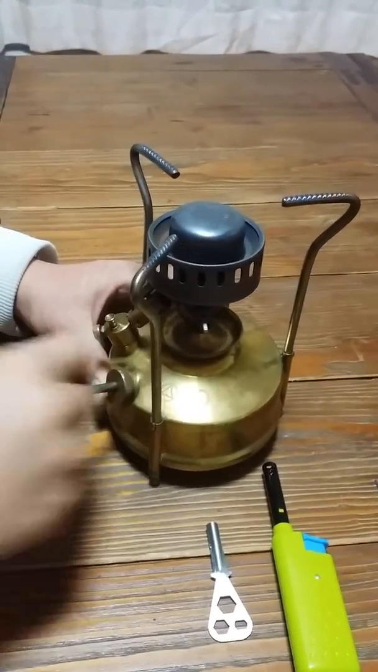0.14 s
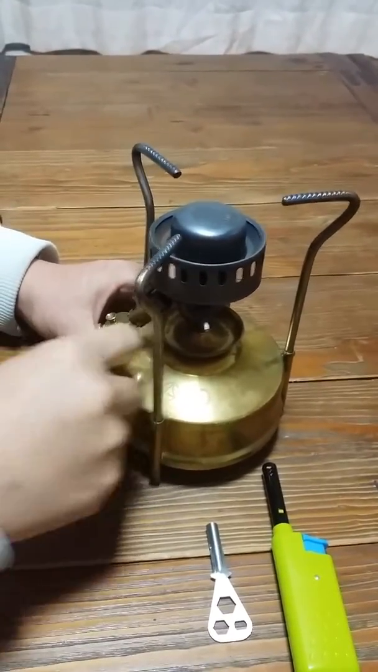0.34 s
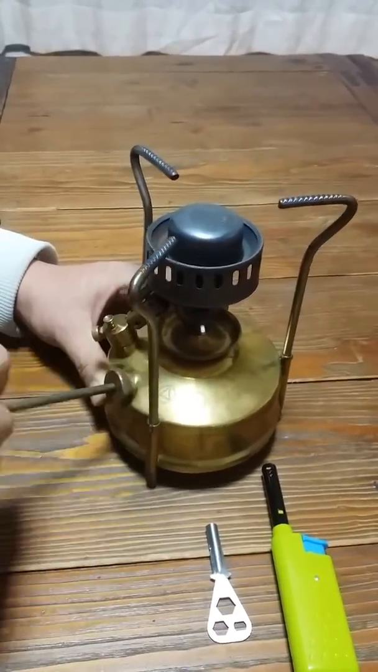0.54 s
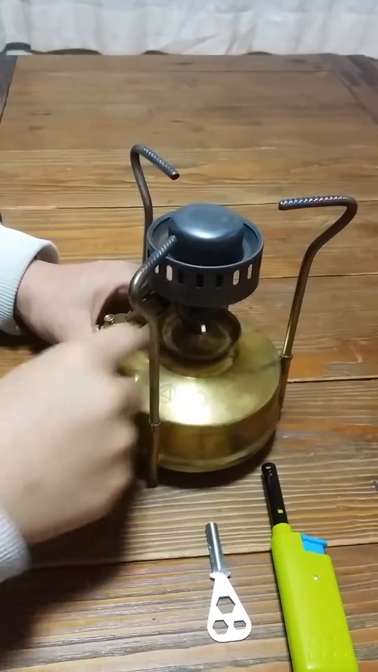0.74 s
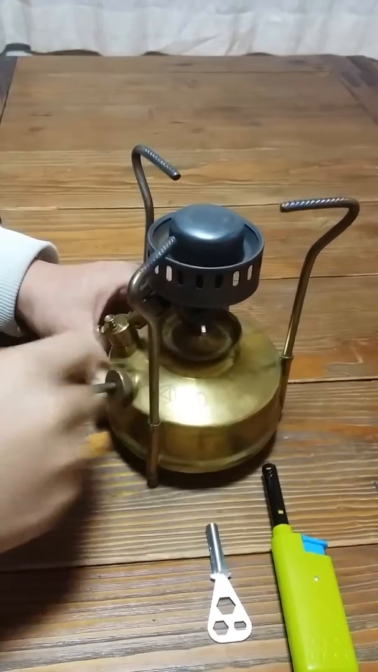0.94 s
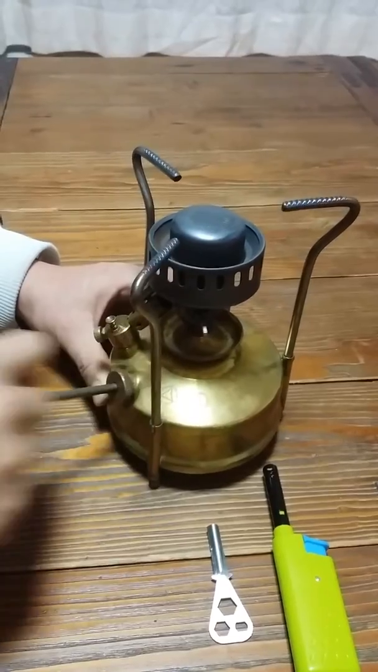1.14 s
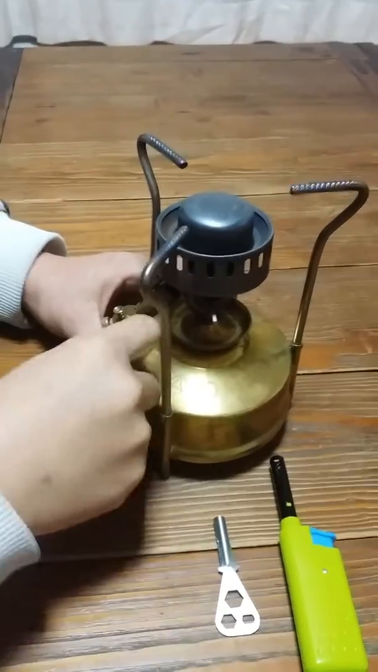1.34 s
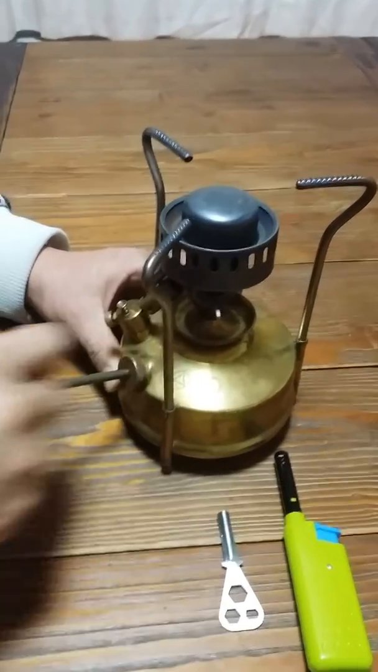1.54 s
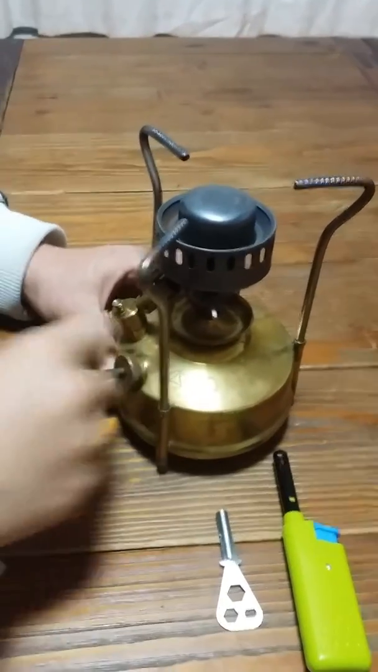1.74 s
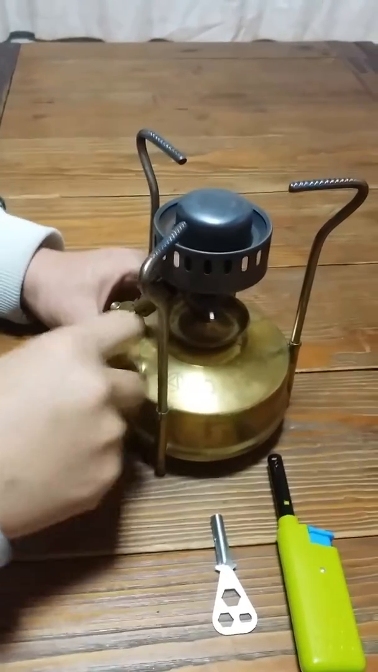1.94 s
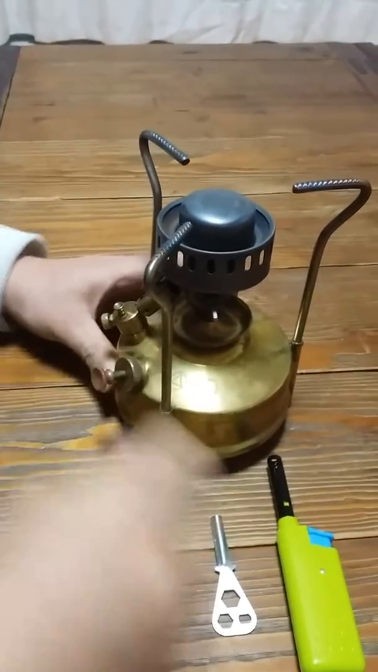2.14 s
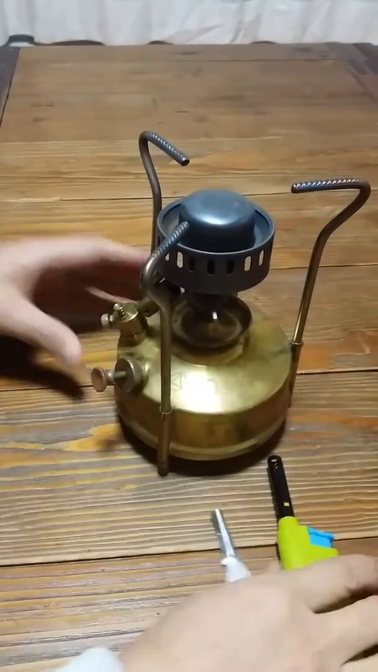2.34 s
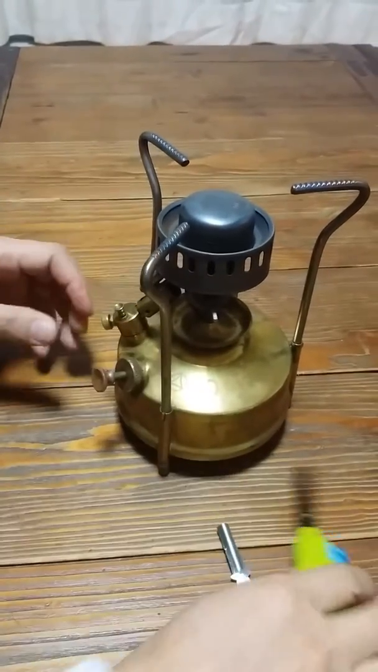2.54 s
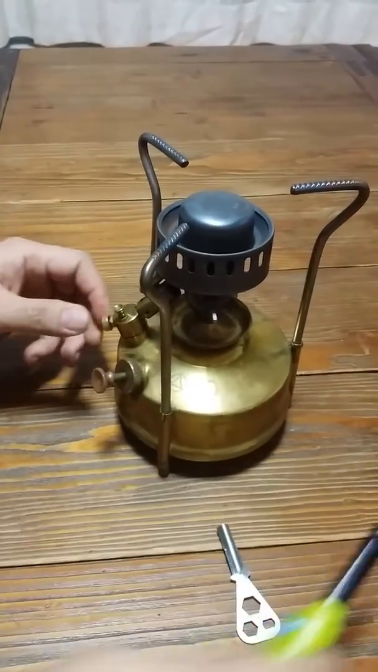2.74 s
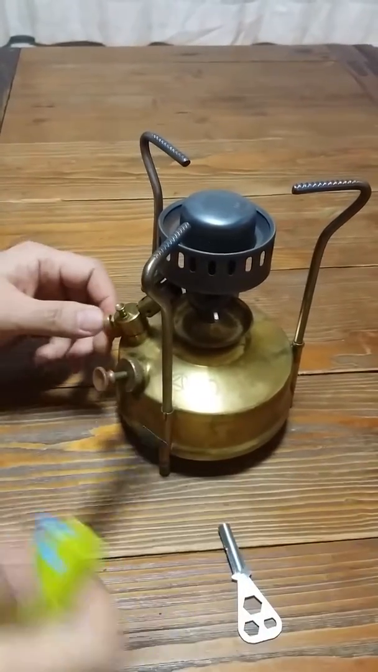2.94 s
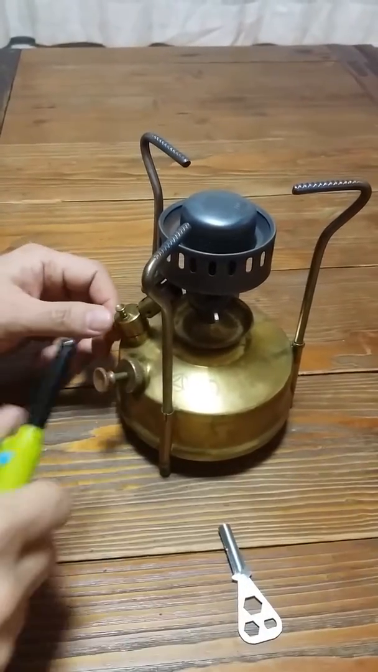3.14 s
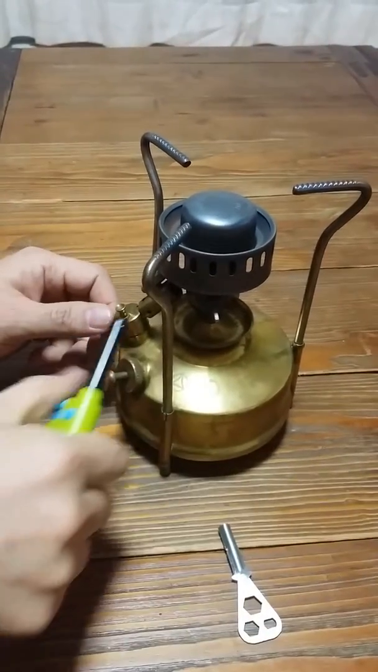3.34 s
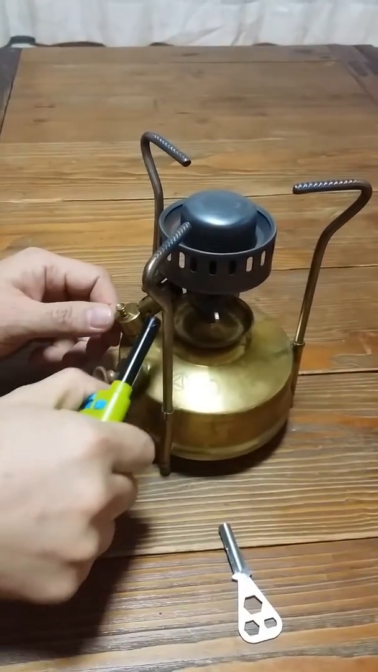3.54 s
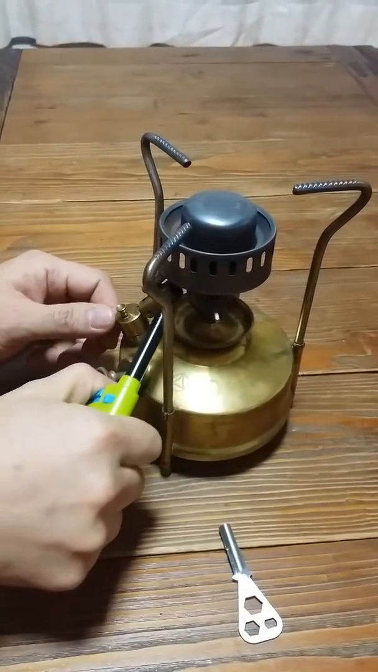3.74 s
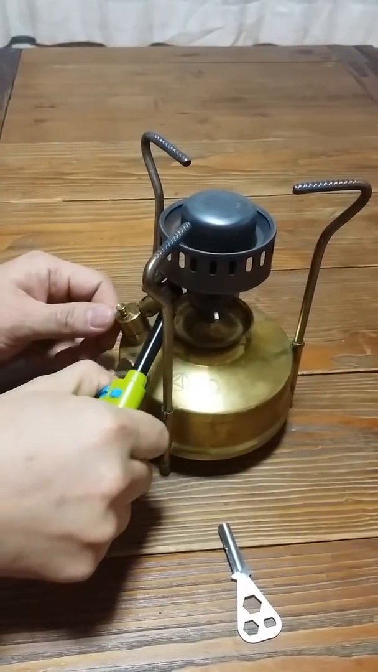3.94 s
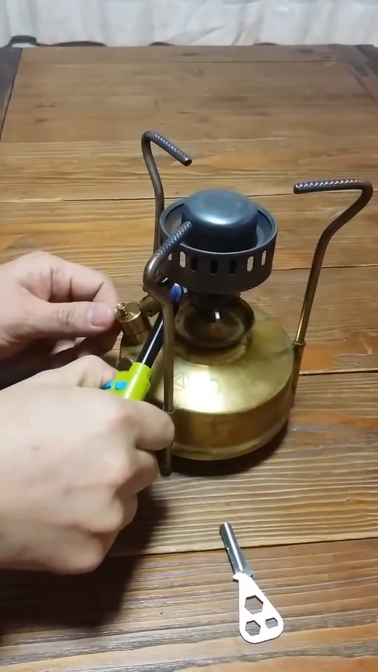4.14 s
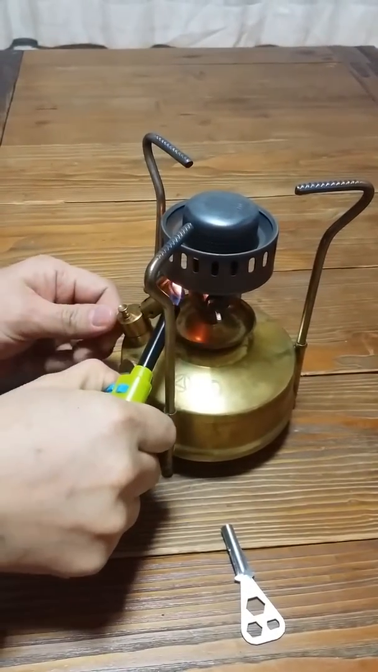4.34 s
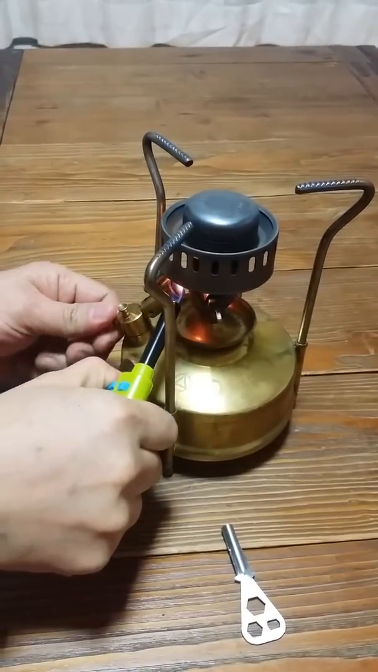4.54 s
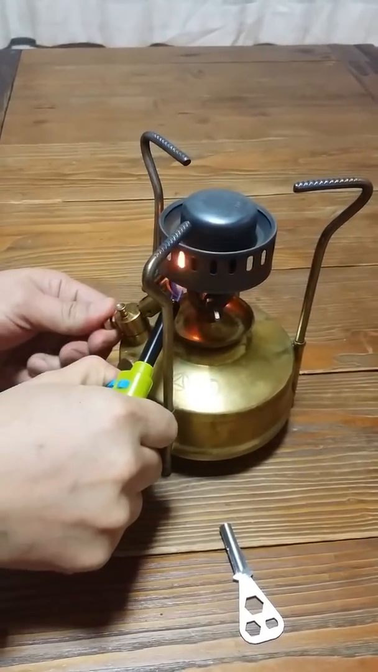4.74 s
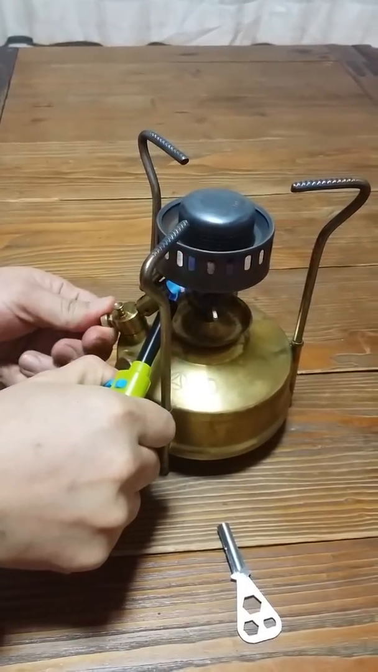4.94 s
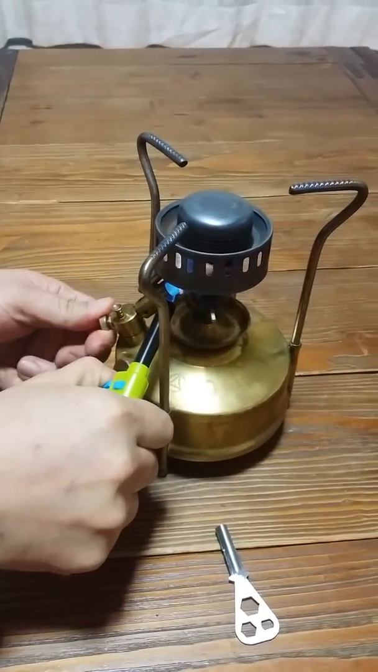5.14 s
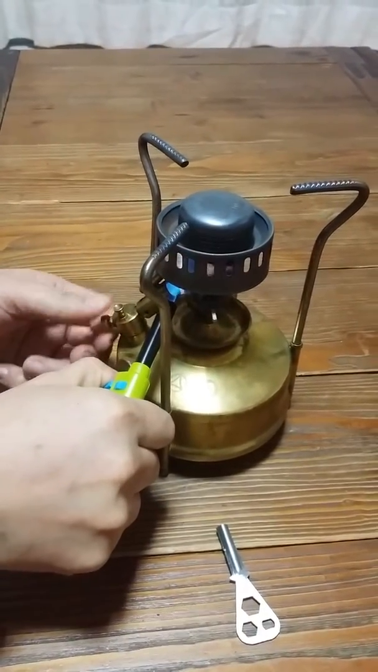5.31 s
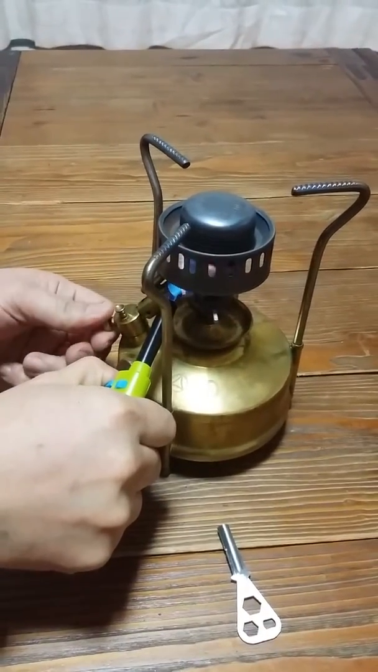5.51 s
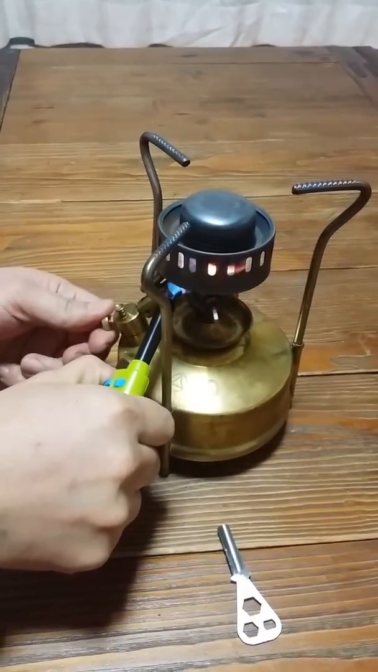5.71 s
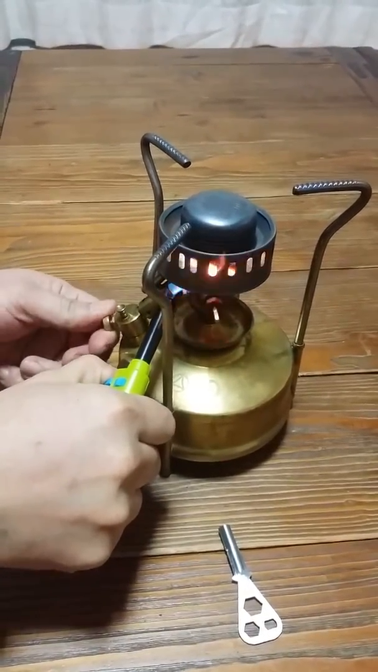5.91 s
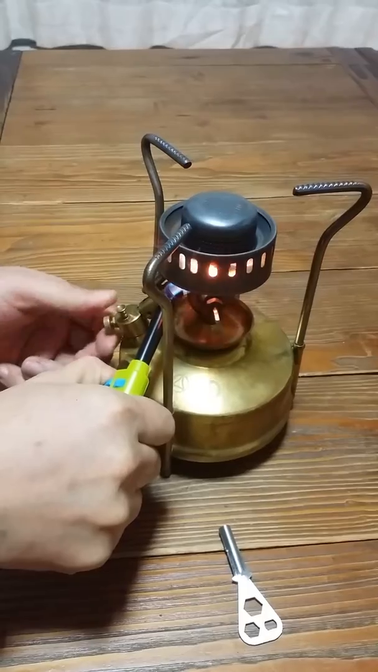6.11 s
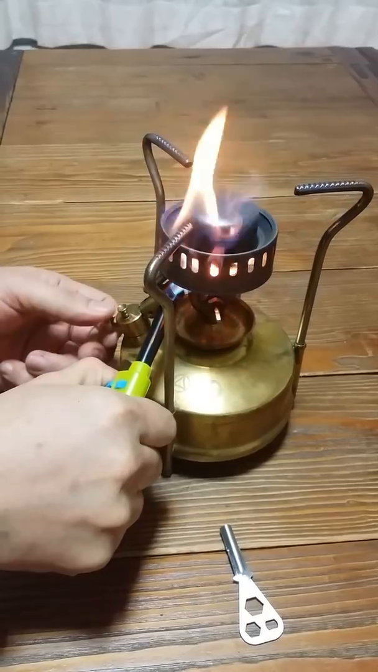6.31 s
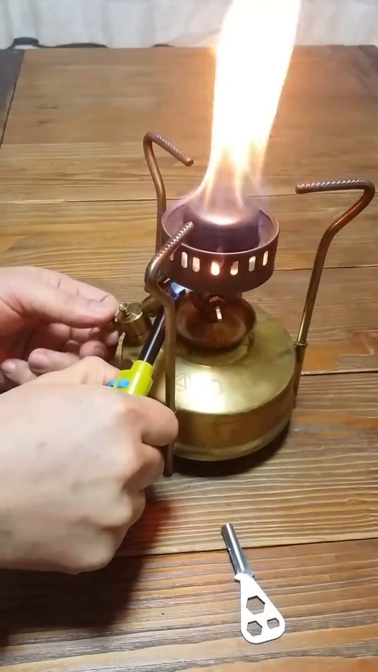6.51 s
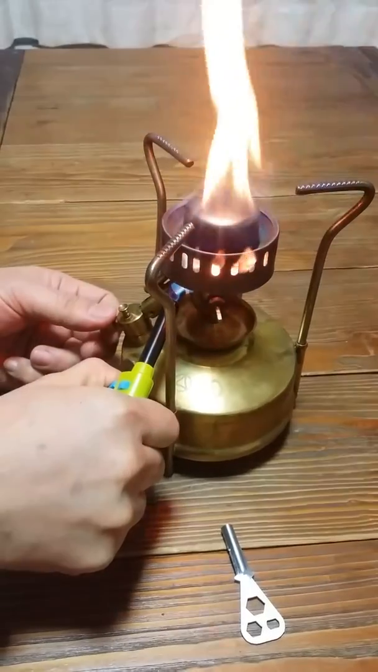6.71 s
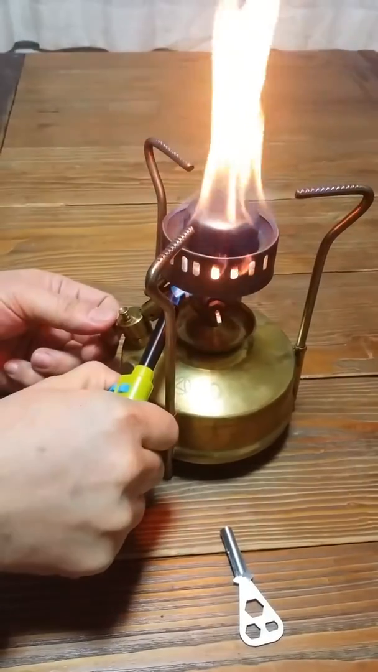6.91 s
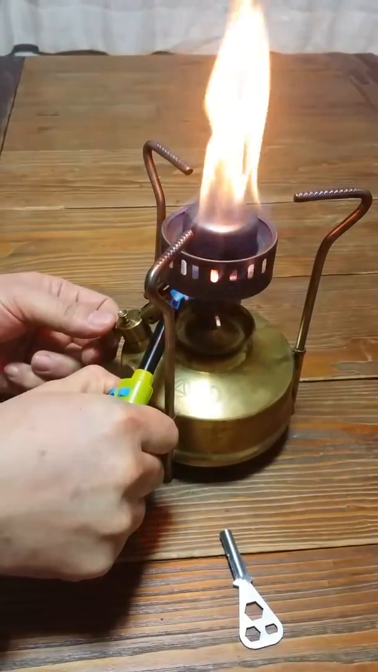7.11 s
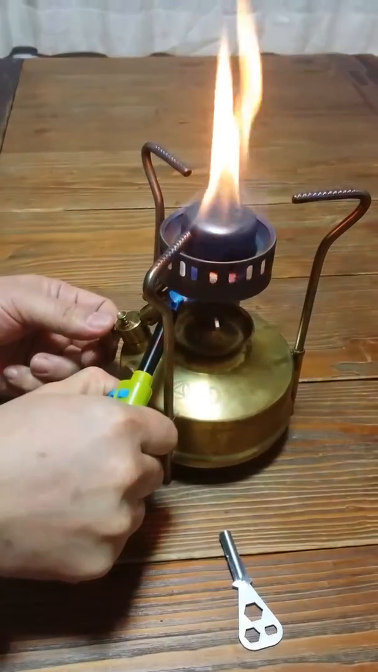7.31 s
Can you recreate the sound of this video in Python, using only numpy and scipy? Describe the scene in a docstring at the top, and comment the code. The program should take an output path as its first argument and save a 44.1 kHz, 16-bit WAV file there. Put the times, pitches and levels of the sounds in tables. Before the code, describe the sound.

Four quick clattering pump strokes on a brass stove, a lighter scraped off wood, a sharp trigger snap, then a fluttering burner roar with steady hiss.

```python
"""A brass pressure stove on a wooden table in a small room, close to a phone with two microphone ports.
Four pump strokes jolt it: noise cracks, ringing brass modes and thuds of the table top.
A gas lighter is dragged off the table in stick-slip grains and its trigger snaps as a burst of resonant noise.
Then the burner catches: a fluttering low roar under a jet hiss that rings in the burner cap, all shaped noise.
Small ticks, rustling sleeves and hands moving on the wood fill in around it."""
import sys
import numpy as np
from scipy import signal
from scipy.fft import rfft, irfft
from scipy.io import wavfile
from scipy.ndimage import uniform_filter1d

SR = 44100
rng = np.random.default_rng(int(sys.argv[2]) if len(sys.argv) > 2 else 0)


def generate_wav(signal):
    """Clip the signal to [-1, 1] and save it as 16-bit WAV at the path in sys.argv[1]."""
    frames = np.transpose(np.atleast_2d(signal))
    scaled = np.clip(frames, -1, 1) * 32767
    pcm = np.round(scaled).astype(np.int16)
    wavfile.write(sys.argv[1], SR, pcm)


def volts_from_db(level):
    """Convert decibel levels to linear amplitude ratios."""
    exponent = np.asarray(level, float) / 20
    return 10 ** exponent


N = 324558
HZ = np.fft.rfftfreq(N, 1 / SR)
T = np.arange(N) / SR
PORTS = np.array([[-1.], [1.]])  # left, right: a positive factor favours the right port

# Levels are relative within a layer unless its function uses them unscaled.
# jolts of the stove on the table: (time [s], metal crack [dB], table thud [dB])
JOLTS = [(0.101, -27.5, -27), (0.1238, -44, -27), (0.282, -10.5, -18), (0.3002, -8, -16),
         (0.316, -14.5, -20.5), (0.3319, -9, -18.5), (0.345, -9, -22), (0.3819, -27, -25.5),
         (0.622, -31.5, -28), (0.6339, -28, -25.5), (0.657, -51, -30), (0.8056, -7, -17.5),
         (0.8222, -8.5, -15.5), (0.8356, -7, -16.5), (0.856, -8, -28.5), (0.8917, -25.5, -17),
         (1.158, -36.5, -35.5), (1.332, -7, -20), (1.347, -5, -21), (1.3632, -11.5, -17),
         (1.376, -16, -18.5), (1.3848, -9.5, -25.5), (1.4272, -43, -25), (1.6965, -31, -26.5),
         (1.725, -54, -32), (1.8677, -7, -19), (1.882, -6, -15.5), (1.8944, -8, -21), (1.907, -3, -26.5),
         (1.9196, -12.5, -23.5), (1.9423, -24, -19)]
# pump strokes: (rod knocks its guide [s], knob lands on the pump cap [s], rod knock [dB], landing ring [dB])
STROKES = [(0.2794, 0.344, -23.5, 2), (0.8048, 0.856, -21, 2.5), (1.3294, 1.3823, -25, 1),
           (1.866, 1.914, -19, -2)]
# modes of the table top: (frequency [Hz], level [dB], t60 [s])
TABLE_MODES = [(72, -5, .4), (152.55, 0, 0.34), (200.7, 1, 0.16), (265, -2.5, 0.06), (341, 1, 0.051),
               (439, -8.5, 0.12), (510, -5.5, 0.12), (575, -2.5, 0.08), (653, -2.5, 0.044), (701, -5, 0.14),
               (760, 0, 0.07), (812, -1, 0.06), (850, -4, 0.06), (950, -11, 0.068)]
# modes of the brass body: (frequency [Hz], level [dB], t60 [s])
BRASS_MODES = [(1660, -3, .05), (1850, -3, .05), (2540, -5, .04), (3630, -9, .05), (3920, -5, .07),
               (5110, -4, .07), (6300, -2, .06), (8000, -3, .06)]
# modes of the pump rod's guide: (frequency [Hz], level [dB], t60 [s])
GUIDE_MODES = [(2270, -6, 0.022), (2580, 1.5, 0.035), (3900, -8, 0.017)]
# colour of the metal crack: (frequency [Hz], density [dB per Hz])
CRACK_COLOUR = [(290, -23.5), (500, -2), (569, 2), (639, -7), (781, -10), (942, -11.5), (1260, -17),
                (1700, -10), (2140, -15), (6970, -13), (7600, -15.5), (11200, -22), (14500, -19.5),
                (15600, -17.5)]
# the rod rattles in the tube as it is drawn back: (start [s], length [s], level [dB])
ROD_PULLS = [(0.105, 0.018, -50), (0.631, 0.012, -40.5), (0.71, 0.0027, -46.5), (1.194, 0.0043, -46),
             (1.245, 0.0041, -45), (1.254, 0.0067, -38), (1.692, 0.008, -58)]

# size of the flame: (time [s], roar level [dB])
FLAME_SIZE = [(4.905, -49), (4.96, -31.5), (5.26, -31), (5.4, -29), (5.52, -27), (5.56, -28.5), (5.87, -36),
              (6.0, -39), (6.77, -37.5), (7.08, -34.5), (7.21, -33.5), (7.36, -33)]
# the vapour catches with a puff: (peak [s], 20 dB rise [s], 20 dB fall [s], level [dB])
IGNITION_PUFF = [(4.885, 0.011, 0.032, -29.5)]
# colour of the roar: (frequency [Hz], density [dB per Hz])
ROAR_COLOUR = [(18, -62.5), (35, -34), (75, -14.5), (110, -10), (165, -5), (210, 0.5), (255, -4.5),
               (361, -10), (580, -12), (684, -11), (1100, -19.5), (1270, -13), (1380, -31), (1500, -17),
               (1950, -31), (3300, -120)]
# colour of the jet hiss: (frequency [Hz], density [dB per Hz])
JET_COLOUR = [(410, -19), (700, -1), (1390, -1), (1690, -12), (2990, -13.5), (3320, 2.5), (3630, -2),
              (4200, -3), (4800, -10), (5710, -7), (9900, -12.5), (10400, -27), (11400, -12.5),
              (15500, -19)]
# resonances of the burner cap: (frequency [Hz], width [Hz], level [dB])
CAP_RESONANCES = [(1290, 36, 1.5), (1657, 186, 1.5), (2370, 220, -3), (4320, 510, -5), (5700, 340, 5.5),
                  (6300, 24, -15), (6550, 180, -2), (7670, 230, -7), (8200, 81, -12), (9070, 140, -10.5),
                  (9830, 160, -10.5), (11000, 73, -11), (11850, 240, -9.5), (14970, 250, -15)]
# the top ring sinks as the cap heats, hot and cold: (frequency [Hz], width before squaring [Hz], level [dB])
HOT_RING = [(13100, 420, 0)]
COLD_RING = [(14000, 700, 0)]

# striker rebounds: (time after the snap [s], level against the snap [dB])
STRIKER_BOUNCES = [(.0085, -18), (0.017, -20)]
# resonances of the trigger: (frequency [Hz], width [Hz], level [dB])
TRIGGER_RESONANCES = [(1720, 320, 2), (2520, 600, -1), (4110, 900, -4), (5360, 620, 1.5), (6840, 740, 6),
                      (8200, 900, -6), (10980, 4200, -8), (14000, 5600, -5)]
# the lighter slips across the table: (start [s], length [s], level [dB], hard edge against that level [dB])
LIGHTER_SLIPS = [(2.375, 0.12, -41, -20), (2.507, 0.073, -50.5, -28), (2.58, 0.068, -42.5, -15)]
# it catches on the grain of the wood: (time [s], level [dB])
GRAIN_CATCHES = [(2.487, -53), (2.597, -52), (2.606, -51), (2.621, -48), (2.636, -51), (2.647, -50),
                 (2.662, -53)]
# resonances of wood and lighter shell: (frequency [Hz], width [Hz], level [dB])
SHELL_RESONANCES = [(149, 54, -7.5), (300, 43, -0.5), (700, 290, -12), (943, 100, -5.5), (1560, 120, -7),
                    (1910, 100, -10), (2610, 140, -14), (3740, 84, -12), (4460, 150, -32), (5220, 150, -20),
                    (6900, 590, -40), (10500, 81, -26)]

# ticks of rod, fingers and lighter: (time [s], level [dB], tock [Hz], bright edge [dB], left minus right [dB])
SMALL_TICKS = [(0.143, -47, 670, -39, -2), (0.177, -32, 713, -43, -8), (0.581, -42, 5440, -56, -6),
               (0.622, -50, 700, -36, -5), (0.678, -41, 682, -45, -9), (0.71, -34, 3100, -61, 7),
               (1.157, -54, 3970, -40, -2), (1.195, -41, 3200, -58, 4), (1.242, -34.5, 735, -48, -10),
               (0.711, -32.5, 794, -60, -8), (1.775, -40, 700, -74, -8), (1.829, -38.5, 2100, -61, -9),
               (2.102, -40, 2160, -56, 15), (2.174, -43, 4020, -53, 0), (2.746, -50, 1470, -70, -9.5),
               (2.846, -52, 1500, -64.5, -20.5), (2.93, -54.5, 1500, -66.5, -10.5),
               (3.367, -45, 2520, -66, -10), (3.507, -50.5, 2370, -61, -20), (3.598, -43, 2300, -64, -8),
               (3.606, -55.5, 2500, -59, -4), (3.745, -48, 1000, -61, -15), (3.81, -49, 2520, -56, -5),
               (4.026, -53, 2710, -67.5, -15), (4.119, -55, 2970, -58, -8), (4.21, -34, 8300, -44, -4),
               (4.287, -50, 940, -62, -24), (4.464, -50, 1300, -48, -20), (4.735, -62, 4500, -53.5, -13)]
# hollow taps: (time [s], level [dB], tock [Hz], bright edge [dB], left minus right [dB])
HOLLOW_TAPS = [(1.256, -35, 1770, -44, -13), (2.394, -37, 2000, -58, 2), (2.412, -32, 1050, -71, -10),
               (2.452, -34, 1530, -59, -23), (2.492, -37, 1500, -62, -12), (2.522, -36.5, 1560, -55, -16),
               (2.559, -41, 1560, -70, -15), (4.508, -29, 1430, -58.5, -17)]

# hand movements: (peak [s], 20 dB rise [s], 20 dB fall [s], level [dB])
HAND_MOVES = [(2.19, 0.15, 0.22, -42), (2.72, 0.044, 0.28, -59), (3.366, 0.013, 0.023, -60),
              (3.46, 0.096, 0.21, -67), (3.86, 0.25, 1, -58.5), (4.15, 0.04, 0.15, -43.5),
              (4.29, 0.056, 0.11, -50.5), (4.518, 0.11, 0.11, -50), (4.7, 0.2, 0.19, -53)]
# sleeve movements: (peak [s], 20 dB rise [s], 20 dB fall [s], level [dB])
SLEEVE_MOVES = [(2.78, 0.3, 0.4, -61), (3.49, 0.26, 1, -61.5), (3.93, 0.18, 0.1, -46),
                (4.52, 4.5, 1, -67.5), (4.7, 1, 0.4, -63.5)]
# fingers turn the valve knob: (peak [s], 20 dB rise [s], 20 dB fall [s], level [dB])
VALVE_TURNS = [(4.53, .02, 0.067, -58), (4.7, 0.1, 0.13, -57)]
# dull squeak of the knob: (frequency [Hz], width before squaring [Hz], level [dB])
KNOB_SQUEAK = [(1075, 330, -2), (1500, 300, -5)]
# colour of the rumble in the wood: (frequency [Hz], density [dB per Hz])
RUMBLE_COLOUR = [(18, -57), (30, -24), (113, -5), (152, -8.5), (205, 2), (236, -8), (292, -12), (406, -16),
                 (900, -23.5), (1170, -45.5), (1980, -120)]
# resonances of the rubbing: (frequency [Hz], width [Hz], level [dB])
RUB_RESONANCES = [(980, 680, 2), (1390, 580, 9), (2100, 780, 6), (3040, 900, -7.5)]
# colour of the sleeve rustle: (frequency [Hz], density [dB per Hz])
RUSTLE_COLOUR = [(1650, -30.5), (2800, -4), (6100, 0.5), (6670, 2.5), (10700, -9.5), (11600, -10.5),
                 (14900, -7), (15900, -24), (16500, -53)]
# colour of the quiet room: (frequency [Hz], density [dB per Hz])
QUIET_COLOUR = [(18, -38.5), (30, -2.5), (49, -11), (214, 2), (380, -12), (592, -4), (790, -15.5),
                (949, -11), (2560, -23.5), (6580, -26), (15600, -34)]

# balance of the stove between the ports: (frequency [Hz], left minus right [dB])
STOVE_PAN = [(60, -2.5), (250, -7), (550, 0), (2400, -5.5), (5000, 1), (12000, -4.5)]
# balance of the flame between the ports: (frequency [Hz], left minus right [dB])
FLAME_PAN = [(60, -7), (110, -2), (200, -6), (380, -3.5), (700, -7), (1290, -1.5), (2380, -2.5), (4400, -5),
             (8120, -4), (15000, -10)]
# phase of the flame between the ports: (frequency [Hz], left leads by [radians])
FLAME_LEAD = [(0, 0), (1290, 2.4), (1890, 7.8), (2840, 6.7), (3530, 9.2), (5770, 9.7), (7320, 4.9),
              (8010, -0.8), (8960, 0.3), (10800, -1.5), (11500, -0.2), (12200, -3.8), (13600, 0.7),
              (16200, 3.9)]
# diffuse tail of the room: (frequency [Hz], t60 [s], level [dB])
ROOM_TAIL = [(100, 0.44, -6.5), (400, 0.38, -4), (1500, 0.39, -7), (5040, 0.21, -3), (11700, 0.36, -10)]


def along_hz(table):
    """Read a (frequency, value) table on a log frequency axis."""
    hz, value = np.transpose(table)
    return np.interp(np.log(HZ + 1), np.log(hz + 1), value)


def unit(x):
    """Scale to rms 1."""
    return x / np.sqrt(np.mean(x ** 2))


def filt(x, gain):
    """Apply a gain given at every frequency."""
    return irfft(rfft(x) * gain, N)


def above(hz, order):
    """Smooth high-pass gain: half at hz, steeper with order."""
    return 1 / (1 + (hz / (HZ + 1)) ** order)


def butter(x, order, hz, kind):
    """Butterworth filter with corners in Hz."""
    return signal.sosfilt(signal.butter(order, hz, kind, fs=SR, output="sos"), x)


def humps(table):
    """Gain of resonances side by side, added by power."""
    return np.sqrt(sum(volts_from_db(db) ** 2 / (1 + (2 * (HZ - hz) / width) ** 2) for hz, width, db in table))


def ring(x, modes):
    """Strike a set of decaying sine modes with x."""
    t = T[:SR // 2]
    body = sum(volts_from_db(db) * np.sin(2 * np.pi * hz * t) * volts_from_db(-60 * t / t60) for hz, db, t60 in modes)
    return signal.fftconvolve(np.atleast_2d(x), body[None], axes=1)[:, :N]


def walk(rate):
    """Random levels held 1 / rate s and slewed twice; rms 1."""
    hold = int(SR / rate)
    levels = np.repeat(rng.standard_normal(N // hold + 1), hold)
    return unit(uniform_filter1d(uniform_filter1d(levels, hold), hold)[:N])


def burst(start, t60):
    """Envelope that jumps up at start and fades."""
    fade = volts_from_db(-60 * np.clip(T - start, 0, 3 * t60) / t60)
    return (T >= start) * fade * (T < start + 3 * t60)


def swell(rows):
    """Gain of movements that rise to a peak and fall away, added by power."""
    power = 0
    for s, up, down, db in rows:
        below_peak_db = 20 * np.maximum((s - T) / max(up, .002), (T - s) / max(down, .002))
        power = power + volts_from_db(db - below_peak_db) ** 2
    return np.sqrt(power)


def wide(gain, alike_hz):
    """Noise that is alike in both ports well below alike_hz and drifts apart above."""
    mid, side = rng.standard_normal((2, N))
    mid, side = filt(mid, gain), filt(side, gain * HZ ** 2 / (HZ ** 2 + alike_hz ** 2))
    return unit(np.array([mid + side, mid - side]))


def pump():
    """Each jolt pushes the table top, cracks and rings the brass; loose parts chatter in dense clicks."""
    push, crack, landing_crack, bright, knock = np.zeros((5, N))
    for s, crack_db, thud_db in JOLTS:
        # the contact is a half-sine push: the gentler the jolt, the longer and duller
        contact_s = min(0.00036 * volts_from_db(-.7 * crack_db), .0035)
        push += volts_from_db(thud_db) / contact_s * np.sin(np.pi * np.clip((T - s) / contact_s, 0, 1))
        crack += volts_from_db(crack_db) * burst(s, 0.053)
        bright += volts_from_db(crack_db - 6) * burst(s, .03)
    for start, landing, rod_db, ring_db in STROKES:
        # chatter starts just after the knock and runs on past the landing
        end = landing + .008
        chatter = (T >= start + 0.0018) * (T < end) + burst(end, 0.22)
        crack += volts_from_db(-24) * chatter
        bright += volts_from_db(ring_db - 2.5) * burst(landing, 0.026)
        landing_crack += volts_from_db(ring_db - 17) * burst(landing, 0.022)
        knock[int(start * SR)] = volts_from_db(rod_db)

    # heavy-tailed loudness turns smooth noise into clicks; small metal parts differ at each port above 1 kHz
    grit = wide(1, 1000) * volts_from_db(1.46 * rng.exponential(size=N) + 3.3 * walk(150))
    colour = volts_from_db(along_hz(CRACK_COLOUR))
    metal = volts_from_db(-8.5) * crack * unit(filt(grit, colour))
    metal += landing_crack * unit(filt(grit, colour * above(1300, 6)))  # thin, without bass
    cup = volts_from_db(-17.5) * bright * wide(humps([(7640, 550, 0)]), 7000)
    # a small table top radiates little deep bass
    wood = butter(ring(push, TABLE_MODES), 3, [110, 1250], "band")
    brass = volts_from_db(-44.0) * ring(metal, BRASS_MODES)
    return metal + cup + rattle() + ring(knock, GUIDE_MODES) + brass + volts_from_db(-93.5) * wood


def rattle():
    """Sparse clicks ring the pump tube and the tank while the rod slides out."""
    moving = 0
    for s, length, db in ROD_PULLS:
        moving = moving + volts_from_db(db) * ((T >= s) * (T < s + length) + burst(s + length, 0.018))
    clicks = moving * unit(rng.standard_normal(N) * volts_from_db(1.7 * rng.exponential(size=N)))
    tank = ring(filt(clicks, 1 / (1 + (HZ / 4200) ** 4)), BRASS_MODES)
    return butter(clicks, 2, [1500, 5000], "band") + volts_from_db(-24.5) * tank


def flame():
    """The roar flutters with the flame; the jet hisses more steadily through the cap's resonances."""
    size_db = np.interp(T, *np.transpose(FLAME_SIZE))
    growth_db = size_db + 37.5  # against a small flame
    lit = volts_from_db(-20 * np.clip(FLAME_SIZE[0][0] - T, 0, None) / 0.0099)
    puff = swell(IGNITION_PUFF)
    warm_at_s, warm_takes_s = 5.65, 0.12
    warm = .5 + .5 * np.tanh((T - warm_at_s) / warm_takes_s)

    noise = rng.standard_normal((7, N))
    cap = humps(CAP_RESONANCES)
    colour = np.hypot(volts_from_db(along_hz(JET_COLOUR)), volts_from_db(10.5) * cap / cap.max())
    over_burn, over_jet, over_rim = above(3300, 8), above(10700, 16), above(12300, 16)

    # each layer has its level and its own slow flicker in dB
    roar_gain = np.hypot(lit * volts_from_db(size_db), puff) * volts_from_db(0.96 * walk(25))
    roar = roar_gain * unit(filt(noise[0], volts_from_db(along_hz(ROAR_COLOUR))))
    # the lowest hiss is burning noise and swells with the flame
    burn_gain = np.hypot(lit * volts_from_db(-39.5 + 0.47 * growth_db), volts_from_db(-9.5) * puff) * volts_from_db(1.05 * walk(15))
    burn = burn_gain * unit(filt(noise[4], colour * (1 - over_burn)))
    jet_gain = np.hypot(lit * volts_from_db(-36.5 + 0.1 * growth_db), volts_from_db(-10.0) * puff) * volts_from_db(0.31 * walk(7))
    jet = jet_gain * unit(filt(noise[1], colour * (over_burn - over_jet)))
    # the rings around 11 kHz also fade when the flame shrinks
    rim_gain = lit * volts_from_db(-48 + .45 * growth_db + 0.31 * walk(11))
    rim = rim_gain * unit(filt(noise[3], colour * (over_jet - over_rim)))
    # the top hiss brightens by 4 dB once the cap is hot
    top_gain = np.hypot(lit * volts_from_db(-48 + 4 * warm), volts_from_db(-10.0) * puff) * volts_from_db(0.46 * walk(4.9))
    top = top_gain * unit(filt(noise[2], colour * over_rim))
    rings = volts_from_db(-51) * warm * unit(filt(noise[5], humps(HOT_RING) ** 2))
    rings += volts_from_db(-59) * (1 - warm) * unit(filt(noise[6], humps(COLD_RING) ** 2))
    return roar + patchy(burn + jet + rim + top + lit * rings)


def patchy(x):
    """Six overlapping bands of a hiss each flicker on their own, 1 dB rms at 9 steps a second."""
    band_place = np.clip(1.4 * np.log2((HZ + 1) / 1200), 0, 5)
    return sum(filt(x, np.clip(1 - abs(band_place - k), 0, 1)) * volts_from_db(1 * walk(9)) for k in range(6))


def snap():
    """The trigger lets go: a sharp crack and rebounds, then its spring and plastic parts buzz out."""
    snap_s, snap_db = 4.128, -7
    shake = sum(volts_from_db(db) * burst(snap_s + s, 0.016) for s, db in STRIKER_BOUNCES)
    shake += volts_from_db(-24.0) * burst(snap_s + .011, 0.24) * volts_from_db(3.5 * walk(200))
    # the many small parts reach each port differently above 3 kHz
    buzz = shake * wide(humps(TRIGGER_RESONANCES), 3020)
    buzz += burst(snap_s, 0.01) * unit(filt(rng.standard_normal(N), humps(TRIGGER_RESONANCES)))
    lowest = unit(filt(rng.standard_normal(N), humps(TRIGGER_RESONANCES[:1]) ** 2))
    buzz += volts_from_db(-29.0) * burst(snap_s + 0.0076, 0.065) * lowest
    # so small a part radiates no bass
    return butter(volts_from_db(snap_db) * buzz, 4, 1350, "high")


def drag():
    """Stick-slip grains ring the wood and the lighter's shell."""
    attack_s, release_s = 0.025, 0.037  # times for 20 dB
    low, high = 1 / (1 + (HZ / 650) ** 6), above(3000, 6)
    grains = unit(rng.standard_normal(N) * volts_from_db(2.2 * rng.exponential(size=N) + 2.2 * walk(90)))
    catch = sum(volts_from_db(db) * burst(s, 0.017) for s, db in GRAIN_CATCHES)
    slide, edge = np.zeros((2, N))
    for s, length, db, edge_db in LIGHTER_SLIPS:
        outside = np.maximum((s - T) / attack_s + 1, (T - s - length) / release_s)
        shape = volts_from_db(-20 * np.maximum(0, outside))
        slide += volts_from_db(db) * shape
        edge += volts_from_db(db + edge_db) * shape
    shell = sum(volts_from_db(db) / (1 + 2j * (HZ - hz) / width) for hz, width, db in SHELL_RESONANCES)

    # wood below, shell in the middle, hard edge on top
    out = 0
    for share, gain in ((low, slide), (1 - low - high, volts_from_db(-9.5) * slide + catch), (high, edge + volts_from_db(-4.5) * catch)):
        part = shell * share
        out = out + filt(gain * grains, part / np.sqrt(np.mean(abs(part) ** 2)))
    return out


def ticks(rows, tock_db, dry_db):
    """A short pitched tock with a dry click and a bright edge for each row."""
    out, t = np.zeros((2, N)), T[:SR // 8]
    chance = rng.standard_normal((len(rows), 2, len(t)))
    for (s, db, hz, edge_db, pan_db), noise in zip(rows, chance):
        t60 = min(40 / hz, .024)  # forty cycles, at most 24 ms
        attack = np.minimum(t * hz / 2, 1)
        tock = volts_from_db(db + tock_db) * np.sin(2 * np.pi * hz * t) * attack * volts_from_db(-60 * t / t60)
        edge = volts_from_db(edge_db + 5.0) * butter(noise[1] * volts_from_db(-60 * t / 0.0073), 2, [5200, 13000], "band")
        dry_click = butter(noise[0] * volts_from_db(-60 * t / .009), 2, [hz * .6, min(hz * 2.6, 15000)], "band")
        dry_click *= volts_from_db(db + dry_db) * np.sqrt(3000 / min(hz, 3000))  # low, narrow bands are made up
        i = int(s * SR)
        out[:, i:i + len(t)] += volts_from_db(-PORTS * pan_db / 2) * (tock + edge + dry_click)
    return out


def handling():
    """Rumble in the wood, rubbing, a knob squeak and fine rustle over the room's quiet."""
    # the arm keeps moving through pumping and dragging, and the table rumbles on after each landing
    arm_rests_s = 2.7
    arm = volts_from_db(-20 * np.clip(T - arm_rests_s, 0, None) / 0.044)
    earlier_landing_s = STROKES[0][1] - 0.42  # a landing 0.42 s before the first
    landings = [earlier_landing_s] + [row[1] for row in STROKES]
    after = swell([(s + 0.063, .1, 0.53, -43.5) for s in landings])
    hands = swell(HAND_MOVES)
    sleeves = np.hypot(swell(SLEEVE_MOVES), volts_from_db(-56.5) * arm)
    table = np.sqrt(hands ** 2 + after ** 2 + (volts_from_db(-53.5) * arm) ** 2)

    rumble = wide(volts_from_db(along_hz(RUMBLE_COLOUR)), 900) * table * volts_from_db(1.8 * walk(25) + 1.5 * PORTS)
    rub_gain = np.hypot(volts_from_db(-3.5) * sleeves, volts_from_db(-9) * hands)
    rub = wide(humps(RUB_RESONANCES), 920) * rub_gain * volts_from_db(2.0 * walk(44))
    rustle = wide(volts_from_db(along_hz(RUSTLE_COLOUR)), 1500) * sleeves * volts_from_db(0.49 * walk(32) + 1.1 * PORTS)
    knob = wide(humps(KNOB_SQUEAK) ** 2, 3000) * swell(VALVE_TURNS) * volts_from_db(1.9 * walk(60) + 3 * PORTS)
    quiet = volts_from_db(-62.5 + 1.1 * PORTS) * wide(volts_from_db(along_hz(QUIET_COLOUR)), 720)
    return rumble + rub + knob + rustle + quiet


def place(x, pan_db, lead):
    """Two ports hear x with a level difference [dB] and a phase lead of the left [radians]."""
    left, right, _ = np.broadcast_arrays(volts_from_db(pan_db / 2) * np.exp(1j * lead), volts_from_db(-pan_db / 2), HZ)
    return filt(x, np.array([left, right]))


def scatter(x):
    """Early reflections off table, hands and tank, different at each port; bass bends round it all."""
    t = T[:SR // 40]
    taps = rng.standard_normal((2, len(t))) * volts_from_db(-60 * t / 0.015)
    taps *= volts_from_db(-2.5 + 1.5 * PORTS) / np.sqrt(np.sum(taps ** 2, axis=1, keepdims=True))
    return signal.fftconvolve(butter(x, 2, 447.6, "high"), taps, axes=1)[:, :N]


def room(x):
    """Each port gets its own diffuse tail, every band fading at its own rate; the bass is shared."""
    noise = wide(1, 330)
    centre_hz, *columns = np.transpose(ROOM_TAIL)
    tail = 0
    for hz in 90 * 2. ** np.arange(8):
        t60, db = (np.interp(np.log(hz), np.log(centre_hz), c) for c in columns)
        band = filt(noise, np.exp(-np.log2((HZ + 1) / hz) ** 2 * 2))
        tail = tail + volts_from_db(db) * (band * burst(0.006, t60))[:, :SR] / np.sqrt(t60 * SR / 14)
    return signal.fftconvolve(x, tail * volts_from_db(1.1 * PORTS), axes=1)[:, :N]


def scene():
    """Most of it leans to the right of the phone, and it also fills the room."""
    stove, fire, click, scrape = pump(), flame(), snap(), drag()
    small = ticks(SMALL_TICKS, -7, 2.5) + ticks(HOLLOW_TAPS, -2, -5.5)
    struck = stove + click
    stove_lead_s = .000022
    direct = place(struck, along_hz(STOVE_PAN), 2 * np.pi * HZ * stove_lead_s)
    direct = direct + place(scrape, -8.5, 0) + small + scatter(stove + volts_from_db(-6) * click)
    flame_pan = along_hz(FLAME_PAN)
    direct = direct + place(fire, flame_pan, np.interp(HZ, *np.transpose(FLAME_LEAD)))
    # the wide flame ring also hisses apart at each port, mostly above 2860 Hz
    apart = volts_from_db(-4 - PORTS * flame_pan / 2) * HZ ** 2 / (HZ ** 2 + 2860 ** 2)
    direct = direct + np.array([filt(flame(), gain) for gain in apart])
    to_room = struck + volts_from_db(1.0) * scrape + volts_from_db(-13.0) * small.mean(axis=0) + volts_from_db(-1.0) * fire
    return direct + room(to_room) + handling()


def band_limit(x):
    """A steep low-pass at the top of the band."""
    return signal.sosfilt(signal.butter(12, 16640, fs=SR, output="sos"), x)


def record(dry):
    """Deep bass is cut, the sound ends near 15.5 kHz and the loudest peaks are rounded."""
    cut = butter(dry, 2, 50, "high")
    cut = signal.sosfilt(signal.ellip(11, .3, 70, 15550, fs=SR, output="sos"), cut)
    mix = 0.84 * np.tanh(cut / 0.95)
    return band_limit(mix)


dry = scene()
out = record(dry)
generate_wav(out)
```